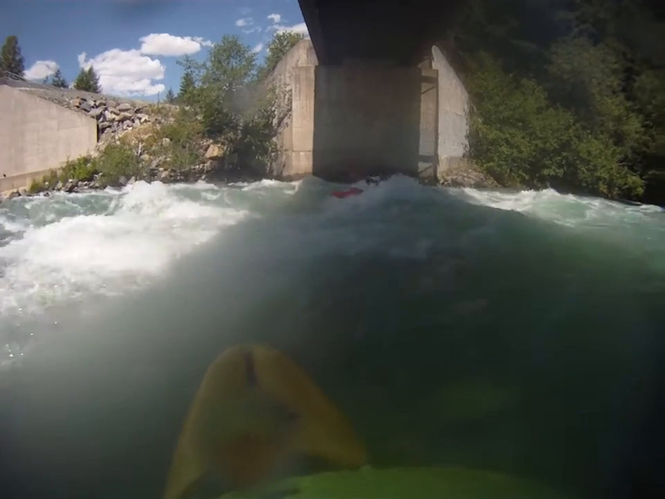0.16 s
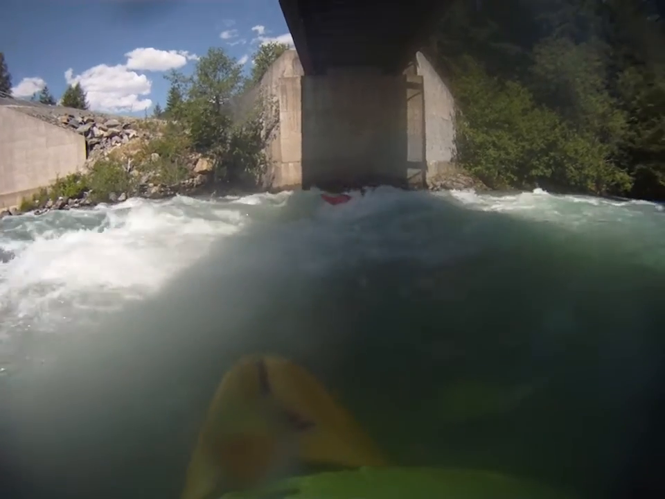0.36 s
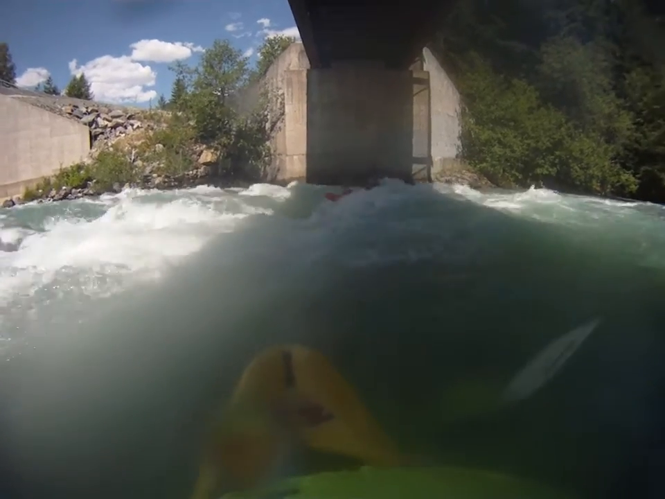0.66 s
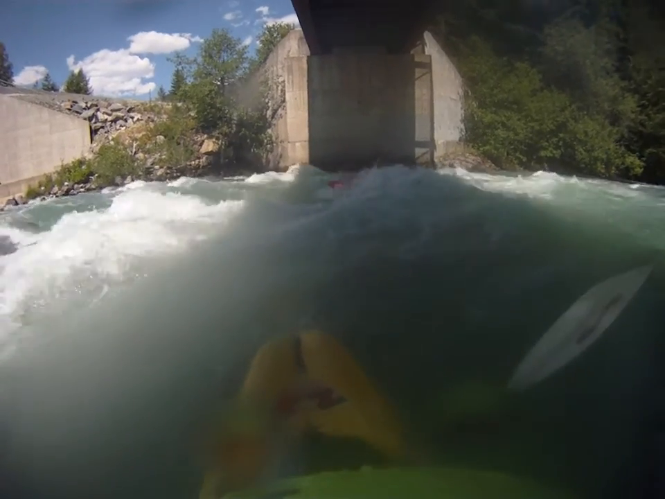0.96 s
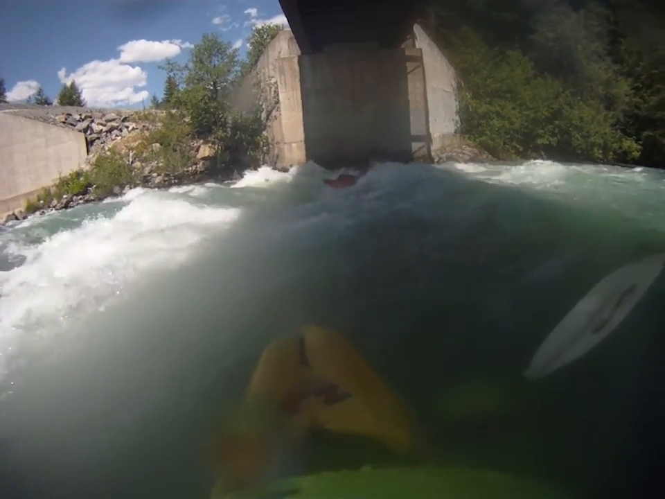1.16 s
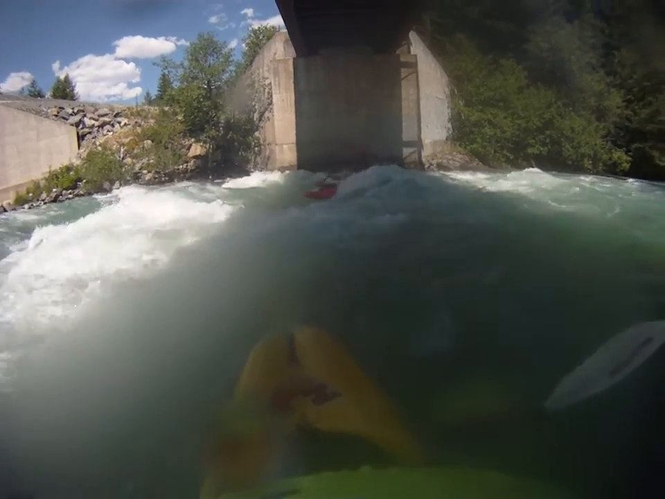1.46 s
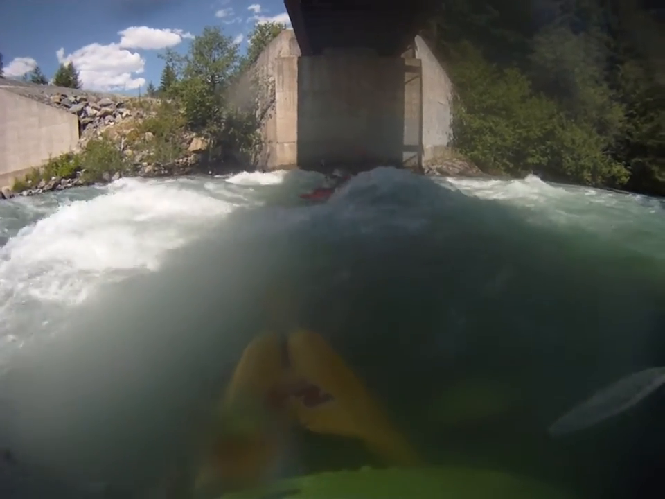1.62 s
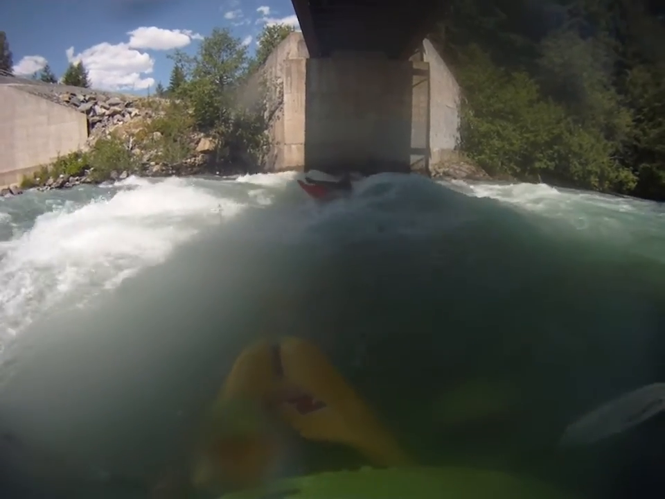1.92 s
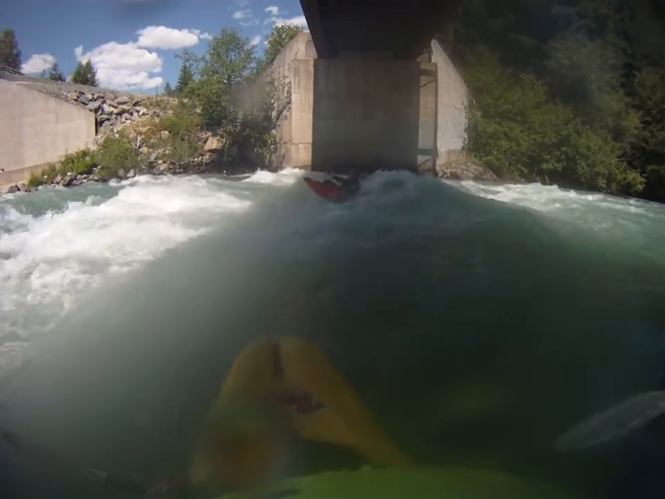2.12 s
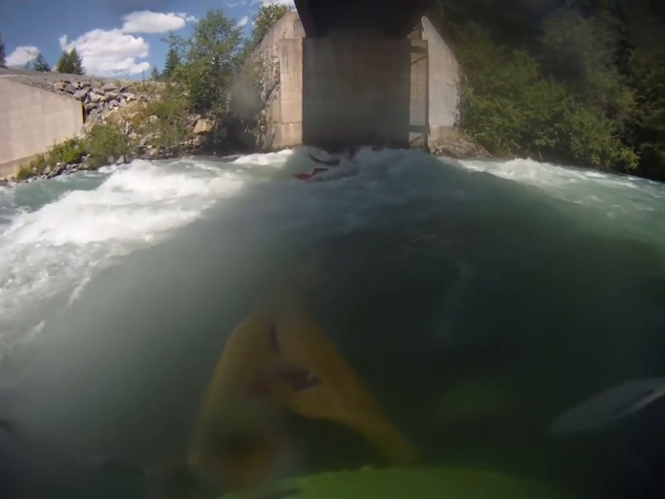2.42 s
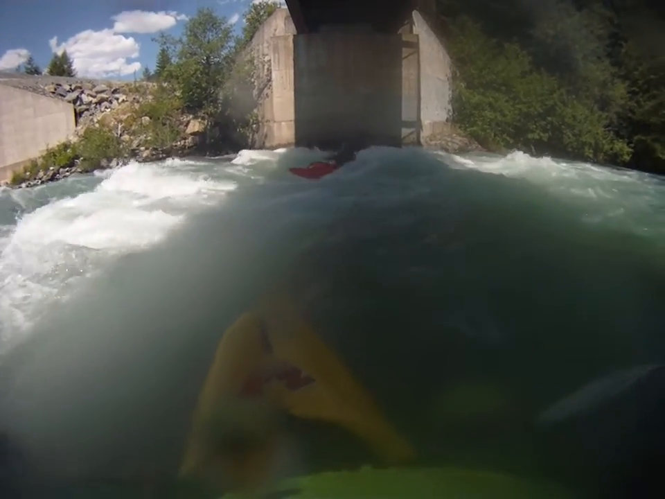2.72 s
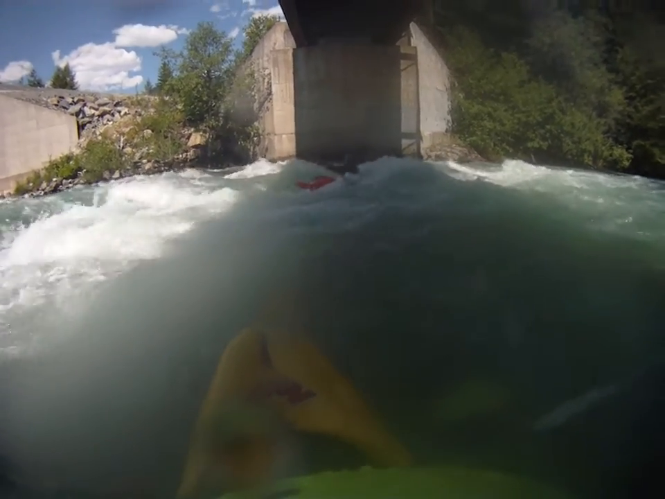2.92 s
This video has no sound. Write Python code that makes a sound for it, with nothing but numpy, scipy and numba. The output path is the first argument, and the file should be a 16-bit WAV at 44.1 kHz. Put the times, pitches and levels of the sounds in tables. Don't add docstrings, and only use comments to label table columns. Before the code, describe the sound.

River rapids rush steadily and close from start to finish, coloured by a resonant waterproof housing and gritty low-quality treble. Underneath, a quiet vehicle hum and rumble passes on the bridge above, slowly sinking in pitch.

```python
import sys
import numpy as np
from scipy import signal
from scipy.fft import rfft, irfft
from scipy.io import wavfile
from scipy.ndimage import uniform_filter1d
from numba import njit

SR = 44100
rng = np.random.default_rng(int(sys.argv[2]) if len(sys.argv) > 2 else 0)


def field_ratio(decibels):
    return 10 ** (np.asarray(decibels, dtype=float) / 20)


def store_wav(level_fs):
    pcm = np.round(np.clip(np.atleast_2d(level_fs), -1, 1) * 32767)
    wavfile.write(sys.argv[1], SR, pcm.T.astype(np.int16))


N = 135828


def unit(x):
    return x / np.sqrt(np.mean(x ** 2))


def walk(rate):
    hold = int(SR / rate)
    levels = np.repeat(rng.standard_normal(N // hold + 1), hold)
    drift = uniform_filter1d(uniform_filter1d(levels, hold), hold)[:N]
    return (drift - drift.mean()) / drift.std()


def colour(x, gain_db):
    f = np.maximum(np.fft.rfftfreq(N, 1 / SR), 1)
    return irfft(rfft(x) * field_ratio(gain_db(f)), N)


def noise_hump(centre_hz, db_per_octave2):
    noise = rng.standard_normal(N)
    return unit(colour(noise, lambda f: -db_per_octave2 * np.log2(f / centre_hz) ** 2))


# t/s, drone f/Hz, drone level/dB, rumble level/dB, throb depth [0-1]
DECK_PASS = [(0, 137.9, -65, -61.5, 0.4), (.45, 136, -60.5, -60, 0.4), (.76, 138.9, -63, -57, .3),
             (.88, 139, -52.5, -53, 0.1), (1.07, 136, -50.5, -58.5, 0.1), (1.13, 134.1, -55, -56, .2),
             (1.2, 136, -53, -61, 0), (1.45, 132.8, -50.5, -58, 0), (1.6, 131, -52, -55, 0.71),
             (1.9, 130, -51.5, -58.5, 0.59), (2.1, 129, -52, -59, 0.7), (2.4, 128, -53, -58, 0.83),
             (2.48, 128.6, -58, -65, 0.42), (2.7, 124.4, -67, -63, 0.6), (2.8, 123, -62, -56.5, .3),
             (2.86, 121.1, -47, -72, 0.2), (2.94, 122, -57.5, -60, 0.28), (3.08, 120.5, -54, -61, .3)]


def vehicle(t):
    times, *columns = np.transpose(DECK_PASS)
    hz, drone_db, rumble_db, depth = (np.interp(t, times, c) for c in columns)
    phase = 2 * np.pi * np.cumsum(hz * (1 + 0.012 * walk(11))) / SR
    throbs_per_s, throb_peak_s = 10.1, 1.81
    throb_phase = 2 * np.pi * throbs_per_s * (t - throb_peak_s) + 0.7 * walk(3.2)
    throb = 1 + np.clip(depth, 0, 1 / 3) * np.cos(throb_phase)
    flutter_db = 1 * walk(13)
    drone = np.sqrt(2) * np.sin(phase) * throb * field_ratio(drone_db + flutter_db)
    rumble = noise_hump(70, 14)
    tyres = field_ratio(1) * noise_hump(221, 16)
    return drone + (rumble + tyres) * field_ratio(rumble_db)


def wash():
    near_db, flicker_db = -0.5, 0.31
    noise = rng.standard_normal(N)
    foam = np.zeros(N)
    last = walk(4)
    for octave in np.arange(-7, 2.6, 0.5):

        def triangle_db(f):
            return 20 * np.log10(np.clip(1 - 2 * abs(np.log2(f / 1000) - octave), 1e-9, 1))

        new = walk(3.93)
        drift_db = near_db * (last + new) + flicker_db * walk(18)
        foam += colour(noise, triangle_db) * field_ratio(drift_db)
        last = new
    return unit(foam)


@njit
def grains(out, start, hz, cycles, size, glide):
    for k in range(len(start)):
        n = int(3 * cycles * SR / hz[k])
        phase = 0.
        for i in range(min(n, len(out) - start[k])):
            phase += 2 * np.pi * hz[k] * (1 + glide * i / n) / SR
            out[start[k] + i] += size[k] * np.exp(-3. * i / n) * np.sin(phase)
    return out


def bubbles():
    bubbles_per_s, middle_hz, spread_octaves = 2800, 1850, 1.136
    count = int(bubbles_per_s * N / SR)
    start = (rng.random(count) * N).astype(np.int64)
    hz = np.clip(middle_hz * 2 ** (spread_octaves * rng.standard_normal(count)), 150, 5600)
    size_db = np.minimum(rng.exponential(2.5, count), 9)
    size = field_ratio(size_db) * np.sqrt(hz / middle_hz)
    return unit(grains(np.zeros(N), start, hz, 4.3 / 3.4, size, 0.18))


# f/Hz, level/dB
RIVER_TONE = [(25, 0), (60, -6.5), (200, -1), (600, -3.5), (1500, 0.5), (3300, -6), (5200, -8),
              (5600, -9.5)]
# f/Hz, width/Hz, level/dB
CASE_MODES = [(743, 120, -6.5), (950, 310, 2), (1125, 140, 2), (1296, 95, -6), (1754, 210, -2),
              (2014, 224, 7), (2271, 296, 13), (2613.5, 276, 14), (2910, 94, 4.5), (3220, 180, -1.5),
              (3610, 100, 3.5), (3873, 210, 4), (4150, 230, 4.5), (4470, 230, -2)]


def case_db(f):
    hz, db = np.transpose(RIVER_TONE)
    wall = np.interp(np.log(f), np.log(hz), db)
    modes = sum(d * np.exp(-0.5 * (2 * (f - centre) / width) ** 2) for centre, width, d in CASE_MODES)
    return wall + modes


# t/s, level/dB
ROAR_SURGES = [(0.0, -40), (0.02, -36.5), (0.8, -37.5), (1.39, -37.5), (1.41, -38.5), (1.76, -37),
               (1.89, -38), (2.56, -37.5), (2.64, -36), (2.65, -38), (2.99, -37), (3.04, -39.5),
               (3.07, -35.5), (3.08, -43)]


def whitewater(t):
    roar = unit(colour(wash() + field_ratio(-8.5) * bubbles(), case_db))
    return roar * field_ratio(np.interp(t, *np.transpose(ROAR_SURGES)) + 1.74)


def scene():
    t = np.arange(N) / SR
    return (vehicle(t) + whitewater(t))[None]


def top_cut(x):
    return signal.sosfilt(signal.butter(12, 15290, fs=SR, output="sos"), x)


def record(dry):
    def antialias_db(f):
        return -8.5 * np.clip((f - 5660) / (6000 - 5660), 0, 4) ** 1.5

    smooth = colour(dry[0] - dry.mean(), antialias_db)
    slow = signal.resample(smooth, N * 40 // 147)
    held = signal.resample(np.repeat(slow, 4), N)
    return top_cut(held[None])


dry = scene()
out = record(dry)
store_wav(out)
```